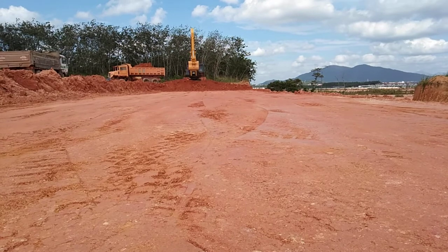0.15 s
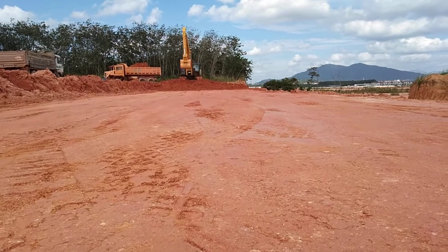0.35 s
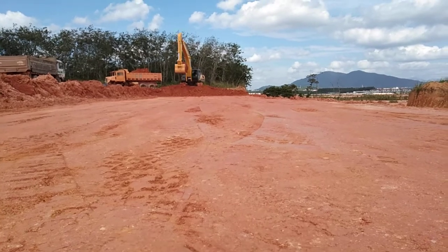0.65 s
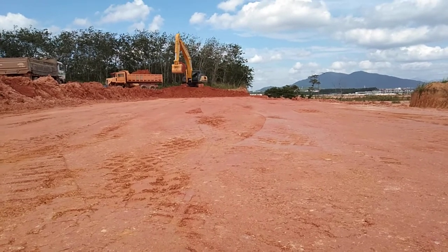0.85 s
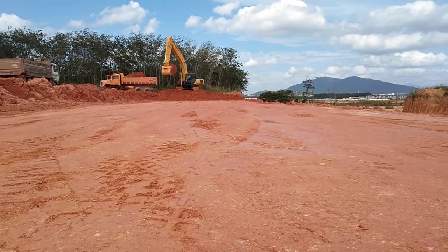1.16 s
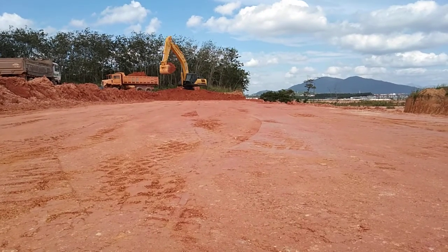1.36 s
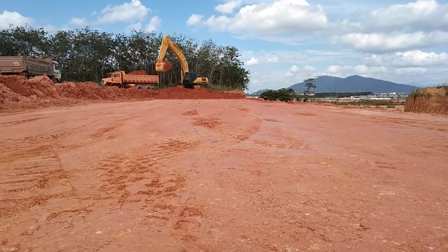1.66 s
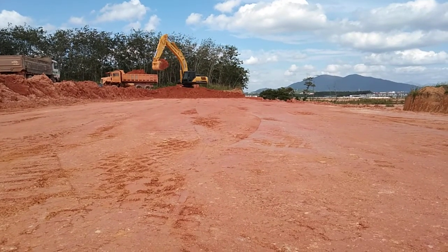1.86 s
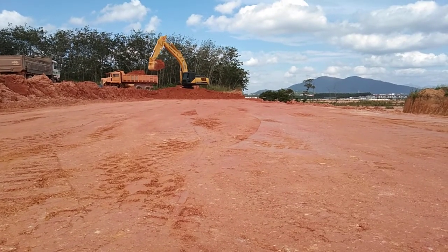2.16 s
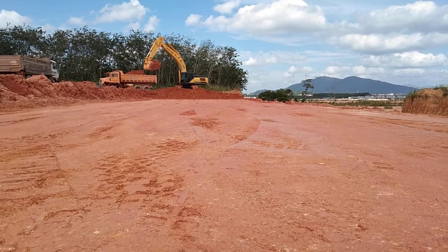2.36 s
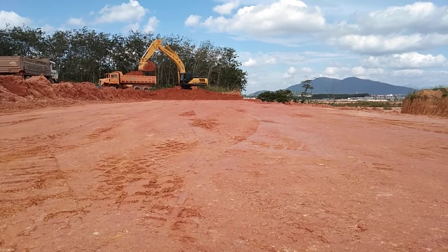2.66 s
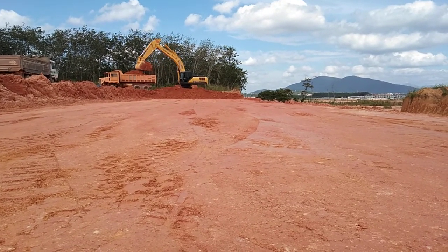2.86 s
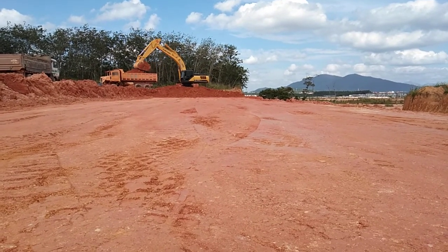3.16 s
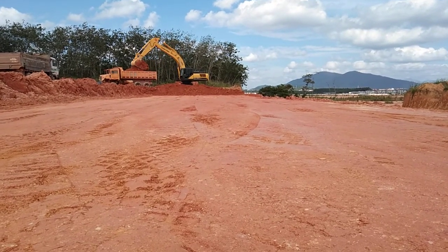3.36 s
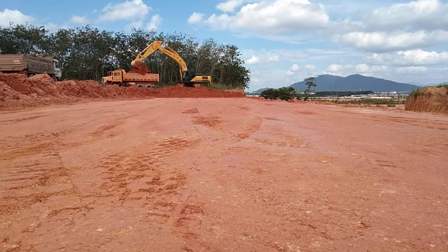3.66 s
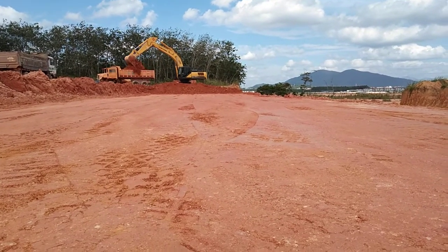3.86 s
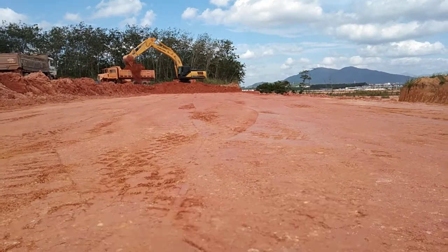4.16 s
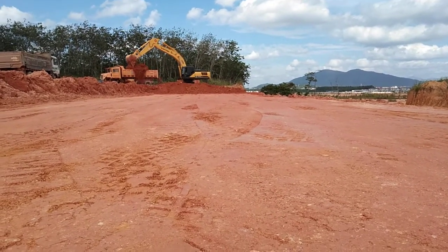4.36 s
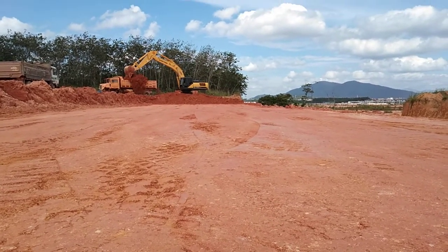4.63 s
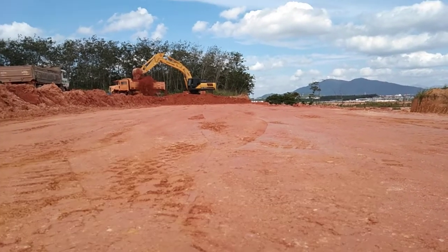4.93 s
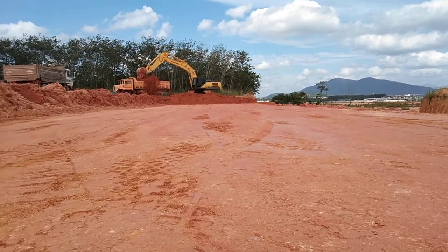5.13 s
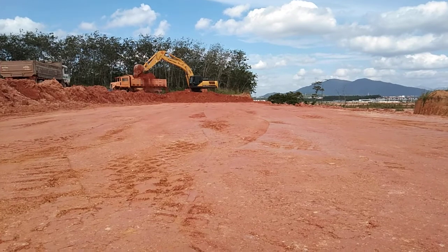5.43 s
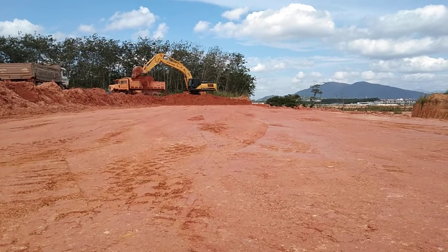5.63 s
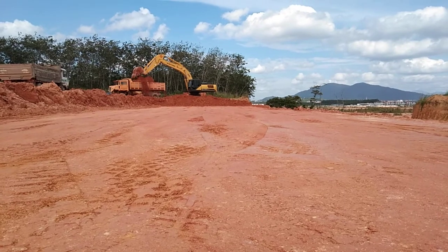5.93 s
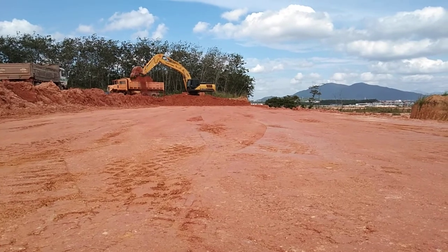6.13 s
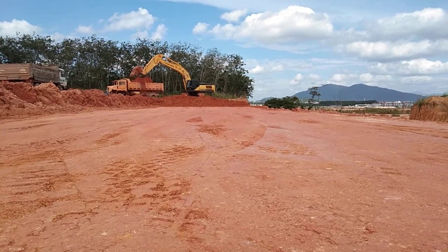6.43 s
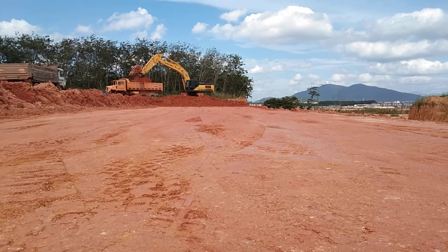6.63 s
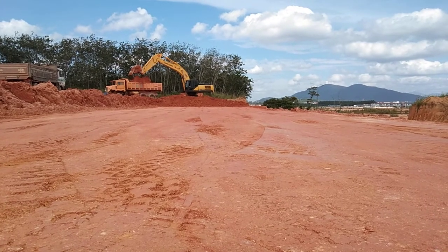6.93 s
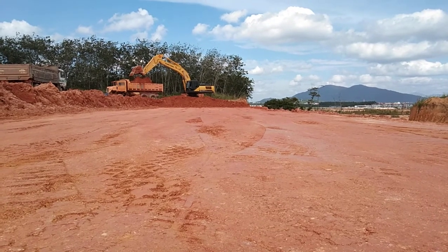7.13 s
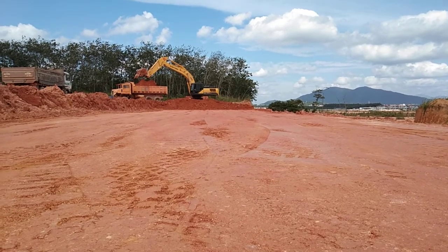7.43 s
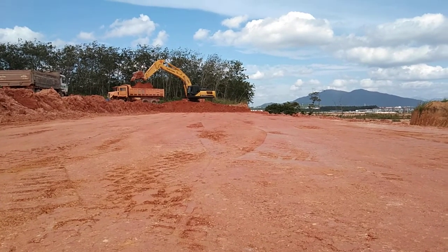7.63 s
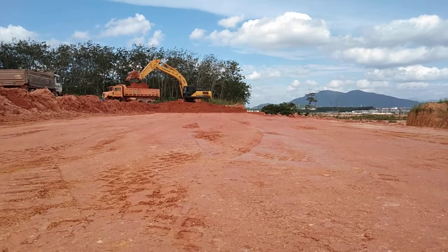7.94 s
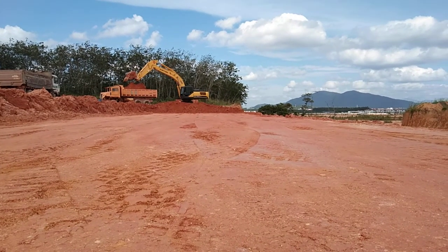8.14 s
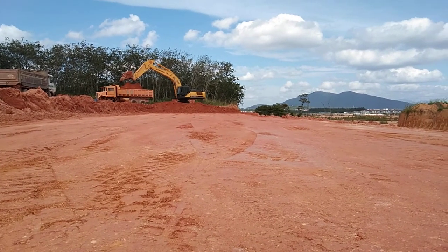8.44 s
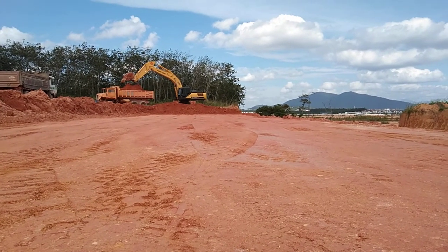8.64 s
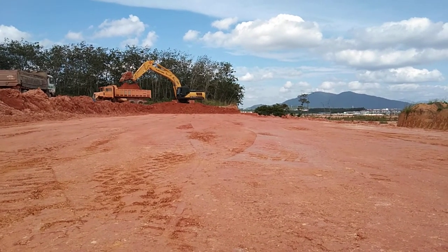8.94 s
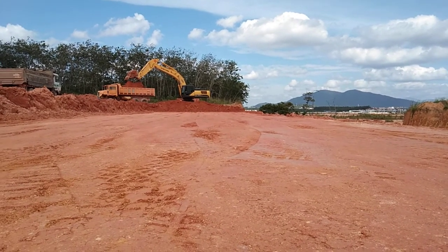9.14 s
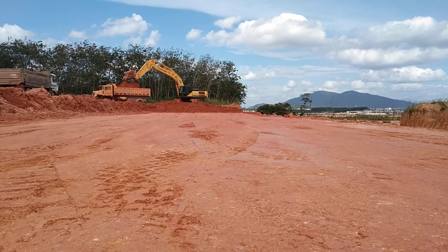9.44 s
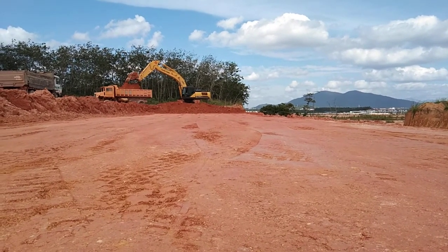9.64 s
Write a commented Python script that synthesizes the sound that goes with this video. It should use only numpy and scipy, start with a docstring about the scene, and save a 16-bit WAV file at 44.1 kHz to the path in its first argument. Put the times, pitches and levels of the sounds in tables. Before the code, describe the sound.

Mostly quiet outdoor machinery heard with a phone: low diesel hum, bright fine valve ticking, irregular soft knocks and squeaky chirps, all dry and open with no echo. A weak short hiss, later one brief nasal horn beep. Then a throbbing rattle of loose steel panels appears, swells, and breaks into repeated hard metallic bangs over a sagging engine growl, much louder than everything before.

```python
"""An open earth site on a phone microphone. Throughout: a six-cylinder diesel (low tone, noise-struck valve
resonances), excavator drone and hums (unsteady sines), far noise, and brief narrow-band bursts, low and high,
that flicker in and out. A thin whine lasts the first 2 s; an air puff (shaped noise) comes at 3.6 s, a horn
toot (harmonics) at 5.8 s. From 7 s a truck pulls away: a falling low note, noise rumble and a growing rattle of
loose steel, with bangs from 8.4 s (flaring noise coloured by panel resonances)."""
import sys
import numpy as np
from scipy import signal
from scipy.fft import rfft, irfft, next_fast_len
from scipy.io import wavfile
from scipy.ndimage import uniform_filter1d, map_coordinates

SR = 44100
rng = np.random.default_rng(int(sys.argv[2]) if len(sys.argv) > 2 else 0)


def digitize_waveform(pressure):
    """Quantize a signal to 16-bit integers and store it at the path in sys.argv[1].

    Rows of a 2-D input are taken as channels; values are limited to [-1, 1].
    """
    field = np.atleast_2d(pressure).T
    bounded = np.clip(field, -1, 1)
    quanta = np.round(bounded * 32767).astype(np.int16)
    wavfile.write(sys.argv[1], SR, quanta)


N = 431738
T = np.arange(N) / SR  # [s]

# Diesel
FIRING_HZ, FIRST_FIRING_S = 33.735, .2316
# relative tick strength of each cylinder in turn (strength [dB])
CYLINDER_TICK_DB = [-11.5, -4, -5, -13, -7.5, -9]
# tick levels: (time [s], valve level [dB], thin ring level [dB])
TICK_LEVELS = [(0.0, -76, -82), (0.54, -71, -86), (1.1, -69.5, -83), (1.8, -72, -77), (2.13, -76, -83),
               (2.5, -64, -85), (2.81, -79.5, -85), (3.6, -76.5, -83), (3.81, -75, -80), (4.0, -77, -84),
               (4.63, -74, -77), (5.15, -79.5, -88), (5.54, -74, -84), (6.22, -82.5, -88),
               (8.07, -78.5, -94), (8.4, -75, -88)]
# valve gear resonances: (frequency [Hz], relative level [dB], t60 [s])
VALVE_MODES = [(8330, 3, 0.019), (8700, -3, 0.034), (9264, -3.5, 0.078), (9600, -3, .03),
               (10100, -11, 0.024)]
# thinner ring above them: (frequency [Hz], relative level [dB], t60 [s])
RING_MODES = [(10600, -10, .04), (11000, -6, .05), (11550, 0, .08), (12080, -2, .04), (12550, -10, .04)]
# ticks that stand out: (time [s], peak [dB])
HARD_TICKS = [(0.2613, -46.5), (0.4399, -45), (0.6185, -52), (0.6479, -59), (0.7991, -68), (0.8834, -41.5),
              (1.1533, -62), (1.1827, -51.5), (1.3004, -46), (1.3314, -55), (1.3608, -60), (1.8632, -57),
              (2.0408, -54), (2.2179, -57), (2.3955, -48), (2.4244, -55), (2.5726, -46.5), (2.602, -48),
              (3.1103, -62), (3.6421, -59), (3.8496, -50), (4.5296, -53), (5.242, -57), (5.4201, -58),
              (5.449, -57), (5.4779, -41), (6.0392, -56), (6.2178, -51), (6.6628, -47.5), (7.0199, -57),
              (7.0494, -46), (7.3786, -56)]
HARD_T60_S, HARD_CREST_DB = 0.21, 14  # crest: peak over rms
TICK_WAVER_DB, TICK_WAVER_KNOTS_PER_S = 4, 6

# Brief narrow-band bursts
# loudest low bursts: (time [s], length [s], frequency [Hz], level [dB])
LOW_BURSTS = [(0.91, 0.021, 463, -48.5), (0.992, 0.083, 465, -51), (1.264, 0.12, 511, -48),
              (1.307, 0.1, 458, -51), (1.462, 0.026, 348, -39.5), (1.506, 0.03, 353, -39),
              (1.534, 0.03, 434, -38.5), (1.548, 0.042, 622, -48.5), (1.55, 0.092, 553, -48),
              (1.701, 0.013, 351, -34.5), (1.729, 0.022, 359, -39.5), (1.76, 0.079, 441, -49),
              (1.777, 0.016, 337.5, -37), (1.799, 0.024, 359, -37.5), (1.847, 0.02, 376, -46),
              (1.908, 0.034, 582, -48.5), (1.935, 0.018, 340, -50), (1.946, 0.05, 481, -49.5),
              (2.024, 0.02, 348, -42.5), (2.072, 0.066, 395, -39.5), (2.245, 0.045, 659, -54),
              (2.685, 0.02, 314, -44.5), (2.759, 0.015, 315, -34.5), (2.823, 0.018, 346, -42),
              (2.968, 0.106, 545, -51.5), (3.004, 0.037, 495.5, -47.5), (3.024, 0.018, 446, -37.5),
              (3.046, 0.017, 535, -40.5), (3.082, 0.016, 364, -38.5), (3.138, 0.037, 376, -38),
              (3.196, 0.018, 380, -38), (3.234, 0.018, 353, -38), (3.258, 0.076, 347, -43),
              (3.314, 0.027, 605, -52.5), (3.473, 0.11, 426, -46.5), (3.585, 0.018, 386, -42),
              (3.621, 0.04, 387, -43.5), (3.637, 0.017, 347, -35), (3.659, 0.036, 375, -45),
              (3.733, 0.064, 327, -57), (3.746, 0.028, 320, -43), (3.828, 0.18, 282, -43),
              (3.834, 0.13, 302.4, -37.5), (3.958, 0.17, 353.7, -41.5), (4.004, 0.018, 314, -31.5),
              (4.205, 0.062, 448, -43.5), (4.279, 0.015, 358, -43), (4.313, 0.11, 346, -45.5),
              (4.482, 0.026, 390, -51), (4.546, 0.022, 401, -50), (4.581, 0.031, 362, -42),
              (4.624, 0.016, 444, -39.5), (4.736, 0.022, 385, -43.5), (4.794, 0.017, 379, -34.5),
              (4.926, 0.015, 345, -37.5), (5.124, 0.026, 363.4, -47.5), (5.154, 0.032, 393, -46),
              (5.344, 0.02, 470, -51), (5.607, 0.055, 566, -49), (5.778, 0.057, 361, -46),
              (6.142, 0.061, 389, -50), (6.225, 0.06, 446, -45.5), (6.457, 0.11, 376, -53),
              (6.755, 0.041, 454, -49), (7.004, 0.022, 355, -52), (7.194, 0.024, 371, -48.5),
              (7.274, 0.018, 381, -39.5), (7.585, 0.023, 349, -45.5), (7.636, 0.028, 349, -42),
              (7.774, 0.014, 660, -42.5), (7.777, 0.029, 347, -42.5), (7.994, 0.031, 477, -44),
              (8.026, 0.024, 446, -46.5), (8.151, 0.12, 658, -49.5), (8.168, 0.02, 362, -38.5),
              (8.187, 0.047, 450, -43), (8.196, 0.03, 323, -42), (8.248, 0.02, 382, -46),
              (8.294, 0.018, 378, -42.5), (8.374, 0.053, 340, -45.5), (8.425, 0.025, 702, -46.5),
              (8.453, 0.15, 770, -52.5), (8.486, 0.026, 404, -38), (8.495, 0.029, 704, -53),
              (8.511, 0.019, 854, -49.5), (8.526, 0.038, 360, -44), (8.61, 0.045, 562, -50.5),
              (8.651, 0.068, 354, -43.5), (8.797, 0.016, 350, -44), (8.8, 0.095, 682, -50.5),
              (8.857, 0.07, 352, -46), (8.906, 0.026, 672, -47.5), (8.914, 0.064, 770, -48),
              (8.943, 0.013, 664, -41.5), (8.984, 0.059, 820, -52), (9.105, 0.037, 784, -51),
              (9.164, 0.034, 359, -48), (9.186, 0.017, 393, -43), (9.278, 0.016, 445, -45),
              (9.305, 0.034, 654, -48.5), (9.349, 0.024, 616, -48), (9.388, 0.035, 376, -48),
              (9.44, 0.024, 365, -39), (9.541, 0.14, 359, -48.5), (9.553, 0.044, 389, -44.5),
              (9.766, 0.041, 786, -47)]
# loudest narrow high bursts: (time [s], length [s], frequency [Hz], level [dB])
HIGH_BURSTS = [(0.458, 0.038, 1293, -58), (0.85, 0.044, 7400, -65), (1.045, 0.05, 3080, -66),
               (1.061, 0.017, 4760, -56), (1.068, 0.062, 3410, -65), (1.111, 0.027, 4850, -60),
               (1.14, 0.045, 4850, -62), (1.203, 0.075, 5000, -67), (1.247, 0.044, 3420, -62),
               (1.251, 0.022, 4750, -59), (1.287, 0.052, 3770, -63.5), (1.295, 0.06, 4830, -65),
               (1.31, 0.05, 3000, -66), (1.335, 0.04, 4550, -66), (1.435, 0.024, 4680, -64),
               (1.475, 0.05, 4630, -66), (1.658, 0.052, 3150, -57), (1.674, 0.031, 3780, -59),
               (1.821, 0.02, 4480, -58), (1.847, 0.025, 3740, -60), (1.877, 0.024, 3730, -61),
               (2.542, 0.039, 4400, -63), (2.578, 0.069, 1326, -61), (2.699, 0.017, 2780, -60.5),
               (2.743, 0.017, 2910, -58), (2.897, 0.024, 3120, -56), (2.897, 0.055, 1940, -60),
               (2.959, 0.094, 6120, -66.5), (2.988, 0.03, 5630, -68), (3.28, 0.024, 3790, -56),
               (3.388, 0.029, 3800, -62.5), (3.43, 0.04, 3150, -64), (3.47, 0.025, 3110, -59.5),
               (3.639, 0.016, 3100, -57), (3.721, 0.067, 6880, -59), (3.73, 0.096, 6470, -62),
               (3.736, 0.03, 4100, -62), (3.76, 0.18, 8840, -68), (3.761, 0.07, 7020, -60),
               (3.771, 0.049, 8480, -63), (3.789, 0.029, 3200, -61.5), (3.819, 0.05, 8760, -64),
               (3.821, 0.029, 4130, -60), (3.847, 0.024, 4830, -63), (3.85, 0.14, 4860, -67),
               (3.869, 0.035, 8880, -62), (3.968, 0.026, 4470, -62), (4.001, 0.06, 3820, -62.5),
               (4.011, 0.053, 1950, -66), (4.017, 0.078, 2860, -64), (4.198, 0.043, 4090, -64),
               (4.999, 0.1, 4050, -64), (5.074, 0.04, 2970, -63), (5.208, 0.083, 3000, -65.5),
               (5.459, 0.018, 2850, -62.5), (5.62, 0.03, 4240, -65), (5.679, 0.025, 3180, -56.5),
               (5.707, 0.028, 3090, -60), (5.762, 0.015, 4150, -50.5), (5.774, 0.12, 3750, -55),
               (5.793, 0.0044, 4080, -50), (6.082, 0.04, 3040, -57.5), (6.118, 0.026, 3000, -56.5),
               (6.156, 0.11, 3110, -65), (6.575, 0.048, 4360, -63.5), (6.61, 0.045, 3780, -58),
               (6.72, 0.021, 3100, -55.5), (6.966, 0.037, 3720, -64), (7.061, 0.025, 3170, -56.5),
               (7.121, 0.018, 4120, -57), (7.499, 0.048, 2500, -65), (8.472, 0.022, 2570, -53.5),
               (8.68, 0.024, 2460, -49.5), (8.732, 0.032, 2410, -61), (8.782, 0.1, 1830, -62.5),
               (8.898, 0.038, 2570, -57.5), (8.979, 0.031, 1830, -57), (9.763, 0.024, 2670, -52)]
# spectrum of fainter low bursts: (frequency [Hz], relative density [dB/Hz])
MURMUR_SPECTRUM = [(200, -74), (270, -3), (350, 6), (450, -2.5), (600, -9.5), (850, -25), (1400, -23.5),
                   (1700, -52)]
# fainter low bursts: (time [s], lower band level [dB], upper band level [dB])
MURMUR_LEVELS = [(0.0, -70, -83), (0.46, -81, -71), (1.36, -57, -70), (1.96, -50.5, -62),
                 (2.21, -56, -66.5), (2.7, -60, -67), (3.02, -50.5, -61), (3.19, -45.5, -60),
                 (3.52, -55, -62), (3.84, -47, -61), (4.28, -56.5, -65.5), (4.74, -52, -58.5),
                 (4.96, -58, -67), (6.19, -60, -67), (6.38, -50, -65), (7.03, -61, -67.5),
                 (7.96, -56.5, -58.5), (8.31, -52, -57), (8.89, -54.5, -56), (9.79, -55, -61.5)]
MURMUR_SPLIT_HZ = 474
# spectrum of fainter high bursts: (frequency [Hz], relative density [dB/Hz])
CHATTER_SPECTRUM = [(1500, -27), (1900, -6), (3000, -3), (4800, -3.5), (5600, -17), (6500, -19),
                    (7000, -44)]
# fainter high bursts: (time [s], level [dB])
CHATTER_LEVELS = [(0.0, -74), (0.65, -72.5), (1.06, -64.5), (1.22, -62), (2.11, -68), (2.6, -68.5),
                  (2.74, -63.5), (3.19, -64.5), (4.0, -60.5), (4.27, -65), (4.51, -69.5), (5.59, -64.5),
                  (5.88, -59), (6.34, -70.5), (7.08, -66.5), (7.3, -70)]

# Leaving truck
# engine note: (time [s], frequency [Hz], level [dB])
PULL_NOTE = [(6.6, 53.1, -81), (7.5, 56.97, -77), (8.1, 57.03, -56), (8.35, 55.6, -47), (8.62, 50.9, -52),
             (8.95, 44, -61), (9.15, 44.2, -78), (9.3, 45, -120)]
# rumble: (time [s], level [dB])
RUMBLE_LEVELS = [(7.4, -92), (7.9, -55.5), (8.35, -44), (8.7, -41), (8.9, -53.5), (9.1, -71), (9.75, -54)]
# rumble spectrum: (frequency [Hz], relative density [dB/Hz])
RUMBLE_SPECTRUM = [(12, -30), (30, -8), (50, -2), (80, 0), (110, -3), (150, -8), (200, -22), (300, -60)]
# steady rattle, before throb and waver: (time [s], nominal level [dB])
RATTLE_LEVELS = [(6.9, -100), (7.0, -73), (7.3, -55), (7.67, -48), (8.46, -47.5), (8.79, -42),
                 (9.05, -50.5), (9.43, -54), (9.79, -47)]
# top of the rattle's spectrum: (time [s], frequency [Hz])
RATTLE_REACH = [(7, 3500), (7.45, 4530), (8.36, 5550), (8.48, 8600), (8.59, 9800), (8.7, 8700),
                (8.85, 8900), (8.9, 11600), (9.8, 11900)]
# bangs of the steel: (time [s], nominal peak [dB], nominal treble relative to peak [dB])
BANGS = [(8.3629, -38, -30), (8.3908, -35, -32), (8.4168, -31, -15), (8.4732, -37.5, 2), (8.541, -31, -7),
         (8.581, -27.5, -0.5), (8.637, -33, 1), (8.6916, -38, -2), (8.742, -23, -8.5), (8.803, -28.5, -5.5),
         (8.8702, -28, -13), (8.9155, -20.5, -12.5), (8.9394, -31, -8), (8.983, -25, -13),
         (9.054, -25, -36), (9.1005, -18.5, -14.5), (9.1294, -32.5, -6), (9.172, -23, -7.5),
         (9.2584, -29, -17), (9.3114, -21, -6.5), (9.344, -27.5, -5), (9.396, -21, -11), (9.4893, -30, -11),
         (9.551, -19, -10), (9.5794, -26.5, -10), (9.64, -20, -19), (9.7183, -22, -23),
         (9.7678, -14, -11.5)]
# colour of the steel: (frequency [Hz], relative density [dB/Hz])
STEEL_SPECTRUM = [(2300, -55), (2650, -16.5), (2850, -2.5), (3250, -2.5), (3750, -9), (4400, -4),
                  (5000, -6), (5750, -8.5), (6150, -15), (7400, -15.5), (8800, -23.5), (9600, -24),
                  (10500, -32), (12200, -42), (13000, -70)]
# panel resonances, gain before scaling: (frequency [Hz], width [Hz], nominal gain [dB])
PANELS = [(3010, 160, 9), (3280, 140, 5), (3480, 130, 6), (3800, 130, 5), (4130, 170, 8), (4400, 120, 5),
          (4670, 140, 6), (5080, 150, 6), (5500, 150, 5), (6660, 150, 6), (7240, 160, 6), (7600, 150, 6),
          (7970, 150, 6), (8320, 130, 6), (8810, 130, 6)]
# loudest single panels in the early rattle: (time [s], peak [dB], frequency [Hz])
LOUD_CHIRPS = [(7.239, -53, 3070), (7.3211, -49.5, 3470), (7.351, -46.5, 3130), (7.4123, -49, 3540),
               (7.4464, -42.5, 3050), (7.4932, -43.5, 3470), (7.526, -45, 3060), (7.5585, -45.5, 3090),
               (7.61, -42, 3330), (7.6824, -45, 3060), (7.778, -42, 3610), (7.8189, -48, 3100),
               (7.8573, -48, 4230), (7.89, -47, 3010), (7.9327, -43, 3770), (7.991, -43, 4160),
               (8.0349, -48, 4640), (8.0559, -45, 4130), (8.075, -44, 4090), (8.0943, -39, 4000),
               (8.1322, -44.5, 4000), (8.1537, -48, 4270), (8.1732, -42, 4050), (8.253, -46.5, 3000),
               (8.3627, -42, 2980), (8.3917, -42, 3000)]
SHAKE_HZ, SHAKE_PHASE_S, THROBS_END_S = 50.8, 7.781, 8.4  # phase: time of one throb
CHIRP_S, CHIRP_TOP_DB, CHIRP_SPREAD_DB = 0.0083, -1, 9  # top: over the steady rattle; spread: downwards
CRACK_DB, CRACK_T60_S = -16, 0.036  # relative to the bang's nominal peak

# Horn
HORN_HZ = 293.8
# harmonics before swell and raggedness: (multiple of fundamental, nominal level [dB])
HORN_HARMONICS = [(6, -43), (7, -66), (8, -40), (9, -61), (10, -47), (11, -55), (12, -52), (14, -61),
                  (18, -62), (26, -63)]
# toot envelope, as applied to multiple 7: (time [s], level [dB])
TOOT_SWELL = [(5.79, -57), (5.812, -8), (5.84, -0.5), (5.94, -1), (5.965, -9.5), (6.0, -11.5), (6.06, -38)]

# Air puff
HISS_S, HISS_RISE_S, HISS_HOLD_S, HISS_FALL_S, HISS_DB = 3.64, 0.095, .08, 0.044, -61
# puff spectrum: (frequency [Hz], relative density [dB/Hz])
HISS_SPECTRUM = [(3500, -40), (4500, -6), (6500, 0), (9000, -8), (11500, -4), (12800, -9), (13500, -40)]

# Background machines
# excavator firing note: (time [s], frequency [Hz], level [dB])
EXCAVATOR_NOTE = [(0, 97, -69), (.7, 97.5, -63), (1.9, 97.7, -54.5), (2.3, 95, -59.5), (2.6, 97, -52),
                  (3.3, 96, -57), (4.2, 97.5, -56.5), (4.9, 97, -62), (5.2, 95, -61), (7.2, 95, -66),
                  (9.8, 95, -66)]
# thin whine: (time [s], frequency [Hz], level [dB])
WHINE = [(0, 11460, -88), (.6, 11400, -85), (1.15, 11560, -73), (1.42, 11500, -83), (1.9, 11300, -83),
         (2.05, 11280, -110)]
# hums: (frequency [Hz], level [dB])
HUMS = [(150, -63), (291, -73), (448, -72), (899, -77), (1303, -80)]
# far machine noise: (frequency [Hz], relative density [dB/Hz])
FAR_SPECTRUM = [(15, -33), (30, -11.5), (55, -9.5), (120, 0), (165, -6), (220, -8.5), (360, -10),
                (560, -14.5), (800, -20.5), (1350, -25.5), (1600, -29.5), (4500, -36), (6350, -38.5),
                (8200, -32.5), (10500, -70.5), (12500, -62), (12900, -36.5), (15600, -44.5)]

BAND_LIMIT_HZ = 15520


def amp(db):
    """Amplitude ratio of a level."""
    return 10 ** (np.asarray(db) / 20)


def power(db):
    """Power ratio of a level."""
    return amp(2 * np.asarray(db))


def unit(x):
    """x scaled to rms 1."""
    return x / np.sqrt(np.mean(x ** 2) + 1e-20)


def along(points, hz):
    """Interpolate (Hz, value) points on a log axis."""
    f, v = np.transpose(points)
    return np.interp(np.log(hz + 1), np.log(f + 1), v)


def curves(rows):
    """One value per sample for each column after the time."""
    s, *cols = np.transpose(rows)
    return [np.interp(T, s, c) for c in cols]


def wobble(knots_per_s):
    """A smooth random curve through normally distributed knots."""
    return map_coordinates(rng.standard_normal(int(N * knots_per_s / SR) + 4), [T * knots_per_s])


def filtered(x, response):
    """x times a response of frequency."""
    m = next_fast_len(N + SR // 2)
    return irfft(rfft(x, m) * response(np.fft.rfftfreq(m, 1 / SR)), m)[:N]


def flicker(spectrum, patchy_db, flare_db, rare, shape=None, size=512, frames=9):
    """Noise, rms 1 before shape, whose narrow bands waver and flare where a random field passes rare."""
    noise = filtered(rng.standard_normal(N), lambda f: amp(along(spectrum, f)))
    overlap = 3 * size // 4
    hz, t, z = signal.stft(noise, SR, nperseg=size, noverlap=overlap)
    field = uniform_filter1d(rng.standard_normal(z.shape), size=3, axis=0)
    field = unit(uniform_filter1d(field, size=frames, axis=1))
    flare = np.tanh(3 * np.clip(field - rare, 0, 9))
    z = z * amp(patchy_db * field + flare_db * flare)
    mean_square = np.mean(abs(z) ** 2, axis=1).sum() * 4 / 3  # Hann window correction
    if shape:
        z = z * shape(hz[:, None], t)
    return signal.istft(z, SR, nperseg=size, noverlap=overlap)[1][:N] / np.sqrt(mean_square)


def tone(hz, db, waver_db, drift_rad):
    """A sine at rms level db, with random waver in level and phase."""
    phase = 2 * np.pi * np.cumsum(hz * np.ones(N)) / SR + drift_rad * wobble(8)
    return np.sqrt(2) * amp(db + waver_db * wobble(12)) * np.sin(phase)


def struck(blows, modes):
    """Decaying resonances, each excited by its own noise under the blows."""
    t = np.arange(SR // 6) / SR
    out = np.zeros(N)
    for hz, db, t60 in modes:
        force = blows * amp(3.1 * wobble(25) + 5.3 * wobble(6.5)) * rng.standard_normal(N)
        ringing = amp(db - 60 * t / t60) * np.sin(2 * np.pi * hz * t)
        out += signal.fftconvolve(force, ringing)[:N]
    return out


def even(x):
    """x divided by its running quarter-second rms."""
    return x / np.sqrt(np.abs(uniform_filter1d(x * x, SR // 4)) + 1e-12)


def bursts(rows, width_hz, rise_s, fall_s, clean):
    """Narrow-band sounds, part sine, part modulated noise: a fast rise, a hold, an exponential fall."""
    out, t = np.zeros(N + SR), np.arange(SR // 3) / SR
    for s, length_s, hz, db in rows:
        knots = rng.standard_normal((2, 200))
        real, imag = [map_coordinates(c, [np.clip(t * width_hz, 0, 198)]) for c in knots]
        carrier = (clean + (1 - clean) * (real + 1j * imag)) * np.exp(2j * np.pi * hz * t)
        carrier = carrier.real
        rise = np.sin(np.pi / 2 * np.clip(t / rise_s, 0, 1)) ** 2
        fall = np.exp(-np.clip(t - 0.62 * length_s, 0, 9) / fall_s)
        held_rms = np.sqrt(np.mean(carrier[:int(length_s * SR) + 50] ** 2))
        start = max(round((s - rise_s / 2) * SR), 0)
        out[start:start + len(t)] += amp(db) * rise * fall * carrier / held_rms
    return out[:N]


def idling_diesel():
    """Exhaust note at twice the firing rate; each firing scrapes the resonant valve gear, some far harder."""
    k = np.arange(-7, int(N / SR * FIRING_HZ) - 8)
    firings = np.zeros(N)
    at = np.round((FIRST_FIRING_S + k / FIRING_HZ) * SR).astype(int)
    firings[at] = amp(np.array(CYLINDER_TICK_DB)[k % 6])
    # short scrapes over a steady floor
    blows = 0.12 + signal.fftconvolve(firings, signal.windows.hann(SR // 150))[:N]
    valve_db, ring_db = curves(TICK_LEVELS)
    waver = amp(TICK_WAVER_DB * wobble(TICK_WAVER_KNOTS_PER_S))  # the tick level wavers at random
    hard = np.zeros(N)
    for s, peak_db in HARD_TICKS:
        decay = amp(peak_db - HARD_CREST_DB - 60 * np.clip(T - s, 0, 9) / HARD_T60_S)
        hard += decay * np.clip((T - s) / .003 + 1, 0, 1)
    valves = (waver * amp(valve_db) + hard) * even(struck(blows, VALVE_MODES))
    ring = waver * amp(ring_db) * even(struck(blows, RING_MODES))
    return valves + ring + tone(2 * FIRING_HZ, -55.5, 1.2, .2)


def narrow_bursts():
    """Brief narrow-band bursts, low and high, with fainter randomly flaring ones made of noise."""
    murmur = flicker(MURMUR_SPECTRUM, 1.4, 12.1, 0.94, size=1024, frames=7)
    lower = filtered(murmur, lambda f: 1 / (1 + (f / MURMUR_SPLIT_HZ) ** 12))
    lower_db, upper_db = curves(MURMUR_LEVELS)
    faint_low = amp(lower_db) * unit(lower) + amp(upper_db) * unit(murmur - lower)
    chatter = flicker(CHATTER_SPECTRUM, 1.3, 19, 1.61, size=768, frames=13)
    faint_high = amp(curves(CHATTER_LEVELS)[0]) * chatter
    loud_low = bursts(LOW_BURSTS, 74.8, 0.01339, 0.018, 0.4)
    loud_high = bursts(HIGH_BURSTS, 170, .003, 0.022, 0.5)
    return loud_low + loud_high + faint_low + faint_high


def leaving_truck():
    """Falling engine note with a tone at 1.5 times it, rumble noise and loose steel."""
    hz, db = curves(PULL_NOTE)
    note = tone(hz, db, 1.2, .2) + tone(1.5 * hz, db - 3, 2.5, .4)
    rumble = amp(curves(RUMBLE_LEVELS)[0] + 3 * wobble(6.3)) * flicker(RUMBLE_SPECTRUM, 6.4, 0, 9)
    return note + rumble + steel_rattle() + cracks() + panel_chirps()


def steel_rattle():
    """Flaring noise through panel resonances; a throbbing steady part and decaying bangs set its power."""
    def reach(f, t):
        return 1 / (1 + (f / np.interp(t, *np.transpose(RATTLE_REACH))) ** 30)

    def panels(f):
        gain_db = sum(1.31 * g * np.exp(-2 * ((f - c) / w) ** 2) for c, w, g in PANELS)
        return amp(gain_db - 9)

    steel = filtered(flicker(STEEL_SPECTRUM, 2.7, 6.9, 0.37, reach, frames=25), panels)
    shake_db = 4.0 * np.cos(2 * np.pi * (T - SHAKE_PHASE_S) * SHAKE_HZ) - 5
    shake_db *= np.clip((THROBS_END_S - T) / 0.046, 0, 1)
    low_power = power(0.99 * (curves(RATTLE_LEVELS)[0] + shake_db + 1.96 * wobble(50)))
    high_power = low_power * power(-16)
    for at, peak_db, treble_db in BANGS:
        u = np.clip(T - at + .003, 0, 9)
        rise = (1 - np.exp(-u / 0.0041)) ** 2
        ring = power(-60 * u / 0.11) + power(-10.5 - 60 * u / 0.67)  # short and long t60
        low_power += power(peak_db - 7.5) * ring * rise
        high_power += power(peak_db + treble_db - 5 - 60 * u / 0.15) * rise
    body = filtered(steel, lambda f: 1 / (1 + (f / 6000) ** 16))
    return np.sqrt(low_power) * body + amp(15.5) * np.sqrt(high_power) * (steel - body)


def cracks():
    """The sharp first contact of every bang: noise with a sub-millisecond rise and a fast decay."""
    shape = np.zeros(N)
    for s, peak_db, _ in BANGS:
        decay = amp(peak_db + CRACK_DB - 60 * np.clip(T - s, 0, 9) / CRACK_T60_S)
        shape += decay * np.clip((T - s) / 0.00078 + 1, 0, 1)
    return shape * flicker(STEEL_SPECTRUM[:10] + [(8000, -60)], 0.92, 0, 9)


def panel_chirps():
    """Each throb of the early rattle rings one random panel within its reach; the loudest are listed."""
    k = np.arange(-29, int((THROBS_END_S - SHAKE_PHASE_S) * SHAKE_HZ))
    at = SHAKE_PHASE_S + k / SHAKE_HZ
    pick, early, drop = rng.random((len(at), 3)).T
    panel_hz = np.transpose(PANELS)[0]
    within = np.searchsorted(panel_hz, np.interp(at, *np.transpose(RATTLE_REACH)))
    hz = panel_hz[(pick * within).astype(int)]
    db = np.interp(at, *np.transpose(RATTLE_LEVELS)) + CHIRP_TOP_DB - CHIRP_SPREAD_DB * drop
    faint = zip(at - 0.0094 * early, np.full(len(at), CHIRP_S), hz, db)
    loud = [(s, CHIRP_S, f, peak_db - 10 * np.log10(2)) for s, peak_db, f in LOUD_CHIRPS]  # peak to rms
    return bursts([*faint, *loud], 154, 0.0064, 0.014, 0.51)


def horn():
    """Harmonics, the high ones swelling late and dying early, with band noise and a ragged tail."""
    s, db = np.transpose(TOOT_SWELL)
    swell_db = np.interp(T, s, db, -120, -120)
    ragged_db = 3.9 + 9 * np.clip((T - 5.94) / 0.025, 0, 1)
    notes = np.zeros(N)
    for k, level_db in HORN_HARMONICS:
        note_db = level_db + swell_db * (k / 7) ** 0.53 - ragged_db * abs(wobble(60))
        notes += tone(k * HORN_HZ, note_db, 1.3, .12 * k)
    noise_db = 0.36 * swell_db - 54.5 - 60 * (swell_db < -60)
    return notes + amp(noise_db) * flicker([(2500, -42), (2900, 11), (4200, -6), (4600, -33)], 2.3, 0, 9)


def air_puff():
    """A short streaky hiss: flaring noise that swells, holds and dies."""
    u = T - HISS_S
    rise = np.clip(u / HISS_RISE_S, 0, 1)
    fall = np.exp(-np.clip(u - HISS_RISE_S - HISS_HOLD_S, 0, 9) / HISS_FALL_S)
    return amp(HISS_DB) * rise * fall * flicker(HISS_SPECTRUM, 3, 9, .6, frames=25)


def machines():
    """Excavator note, thin whine and hums as unsteady sines, over wavering far noise."""
    excavator = tone(*curves(EXCAVATOR_NOTE), 1.6, 0.34)
    whine = tone(*curves(WHINE), 3.7, 7)
    hums = sum(tone(hz, db, 3.5, .9) for hz, db in HUMS)
    far_noise = amp(-54.5) * flicker(FAR_SPECTRUM, 0.97, 0, 9)
    return excavator + whine + hums + far_noise


def scene():
    """Sum of all sources, one channel."""
    return (idling_diesel() + narrow_bursts() + leaving_truck() + horn() + air_puff() + machines())[None]


def record(dry):
    """The phone keeps nothing above its band limit."""
    return filtered(dry[0], lambda hz: hz < BAND_LIMIT_HZ)[None]


dry = scene()
out = record(dry)
digitize_waveform(out)
```